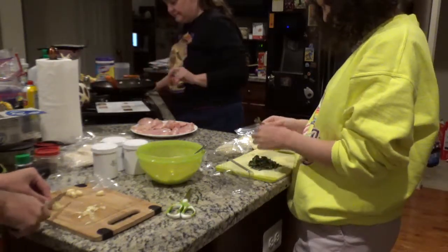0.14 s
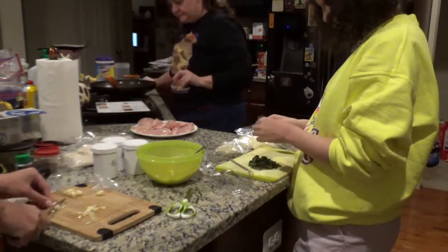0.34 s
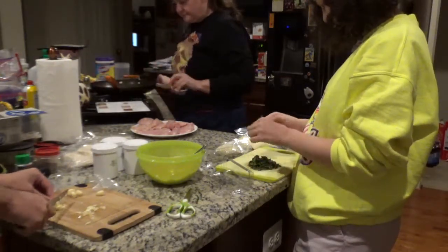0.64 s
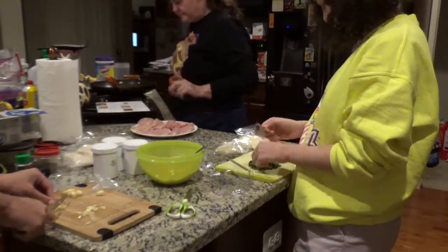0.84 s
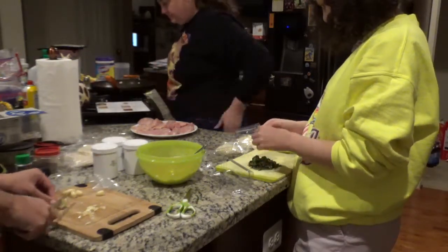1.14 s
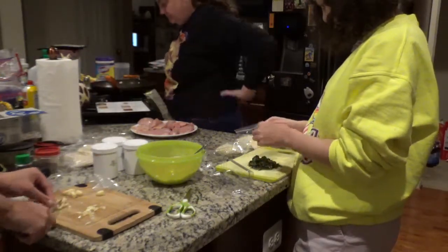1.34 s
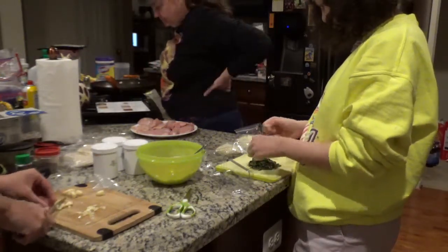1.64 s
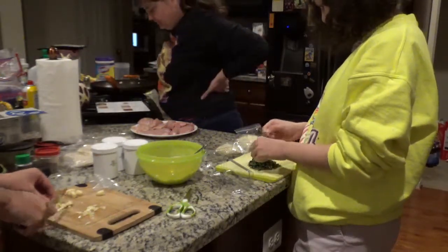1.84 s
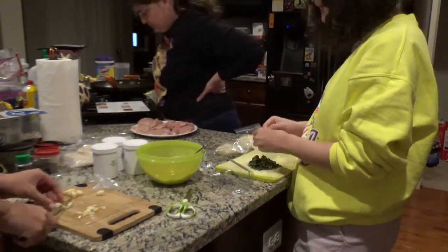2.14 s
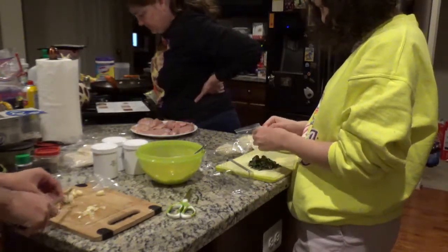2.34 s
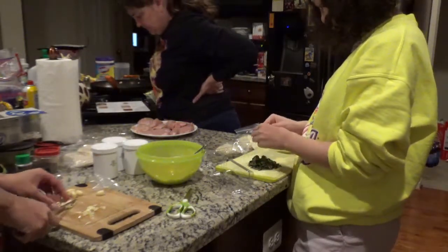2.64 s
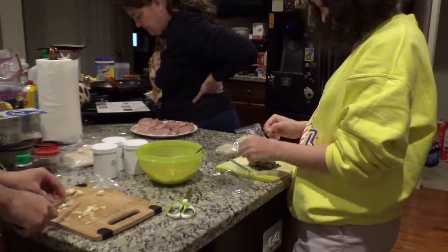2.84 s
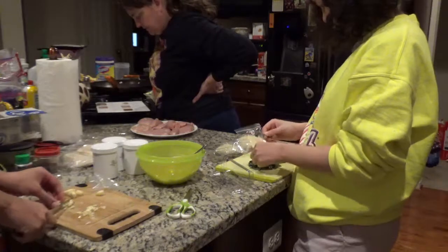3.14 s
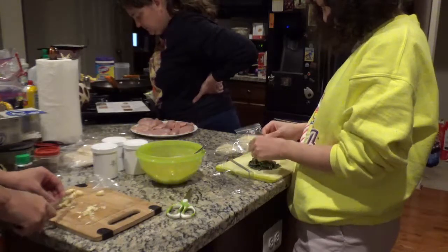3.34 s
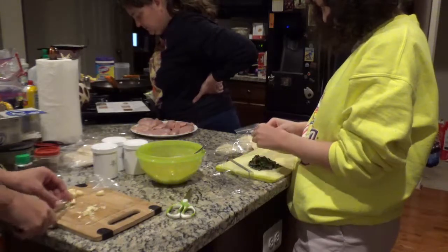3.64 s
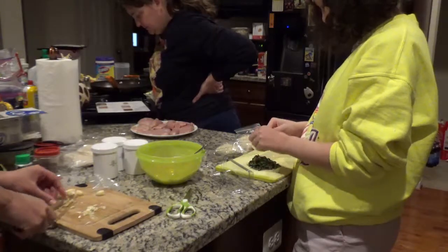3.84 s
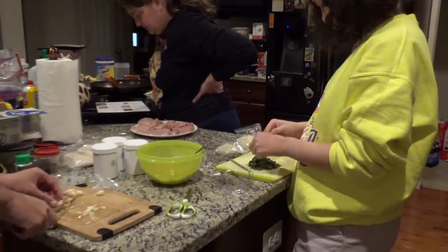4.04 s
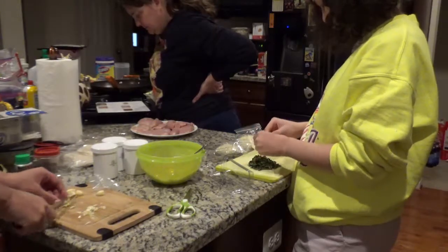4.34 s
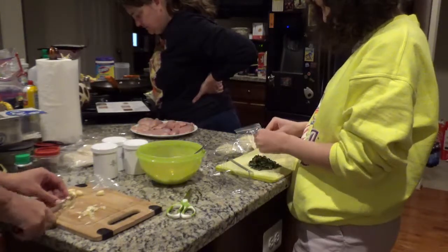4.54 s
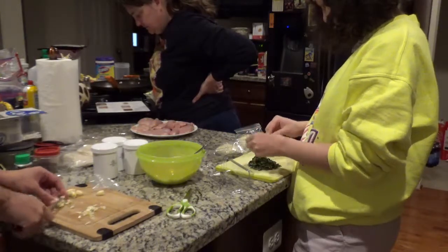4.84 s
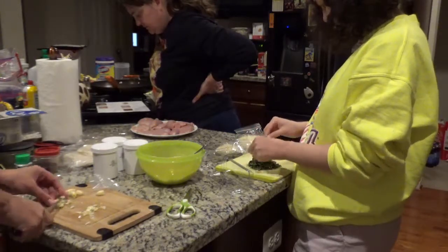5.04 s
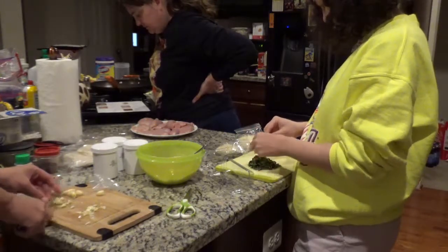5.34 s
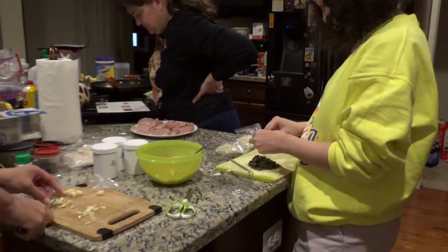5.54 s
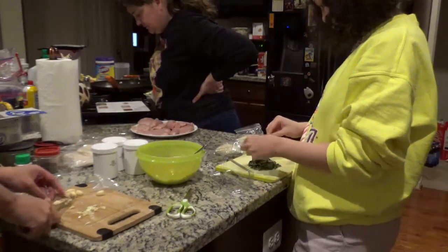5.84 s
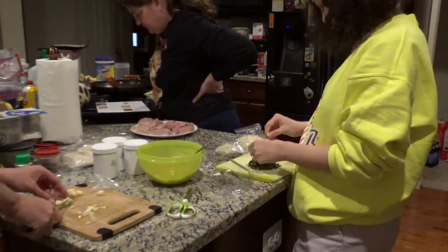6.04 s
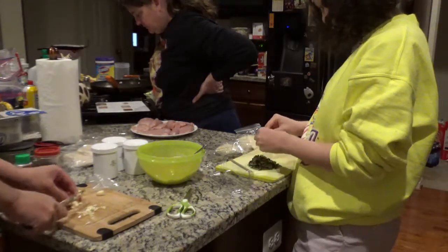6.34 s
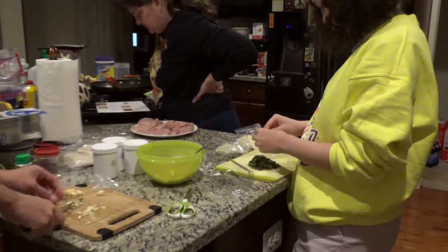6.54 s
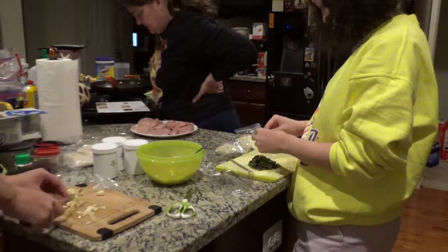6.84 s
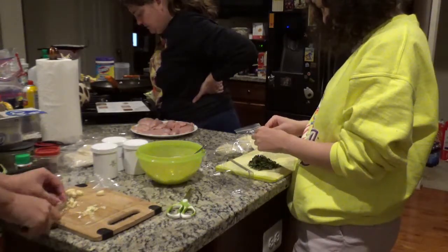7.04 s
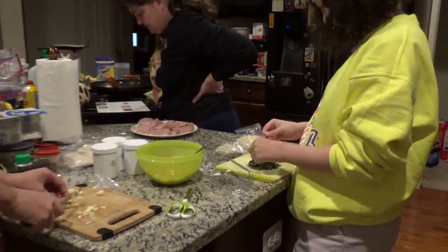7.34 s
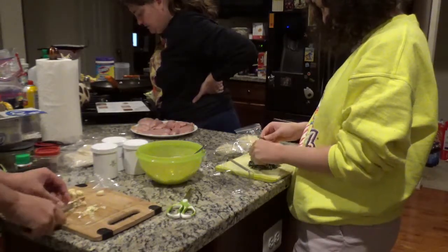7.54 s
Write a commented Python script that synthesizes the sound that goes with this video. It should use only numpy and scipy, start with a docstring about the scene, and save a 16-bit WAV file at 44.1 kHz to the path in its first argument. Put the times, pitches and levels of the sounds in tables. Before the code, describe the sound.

In a home kitchen, a knife cuts garlic on a wooden board close to the microphone. Thirteen sharp woody knocks fall unevenly over about seven and a half seconds, some loud and bright, some softer and duller. Crisp crunches come with many cuts, and thin high steel rings and wipes fill the gaps. Herbs and peel rustle faintly over a quiet appliance hum, with short room echoes.

```python
"""Cutting garlic on a wooden board

A kitchen knife cuts garlic on a wooden board on a stone counter, heard close up over an appliance's hum.
Each cut is a board-shaped impulse sent through room echoes; bursts of noise make the garlic crunch.
Wipes and slips sound the blade's narrow modes; herbs and peel are clumpy filtered noise with faint squeaks.
The appliance is noise shaped into rush and drones. A limiter ducks the loud knocks and recovers quickly."""
import sys
import numpy as np
from scipy import signal
from scipy.fft import rfft, irfft, next_fast_len
from scipy.io import wavfile
from scipy.ndimage import uniform_filter1d, map_coordinates

SR = 44100
rng = np.random.default_rng(int(sys.argv[2]) if len(sys.argv) > 2 else 0)


def store_pcm(level_fs):
    """Save levels as 16-bit WAV."""
    pcm = np.round(np.clip(level_fs, -1, 1) * 32767).astype(np.int16)
    wavfile.write(sys.argv[1], SR, np.atleast_2d(pcm).T)


N = 340011

# Fan's rush: (frequency [Hz], relative level [dB])
FAN_RUSH = [(20, -13), (50, -4), (75, -8), (140, -6.5), (240, 0.5), (350, -5.5), (700, -4.5), (1260, -12),
            (2300, -16), (8000, -22), (11000, -29.5)]
# Drones of the appliance's housing: (frequency [Hz], width [Hz], relative level [dB])
HOUSING_DRONES = [(172.8, 4.2, 4.5), (245.2, 4.3, 0.5), (300, 1.27, 11), (660, 6, -6), (843, 3.2, 4),
                  (983, 4.1, 2.5)]

# Fingers pick through herbs and peel: (time [s], relative level [dB], length [s])
HERB_RUSTLES = [(.53, -49, 0.17), (1.1, -48, 0.15), (1.61, -44.5, 0.29), (2.1, -49.5, 0.22),
                (2.78, -47, 0.29), (4.71, -43.5, 0.026), (5.62, -42, 0.091), (6.1, -53, 0.17),
                (6.53, -42, 0.048), (6.8, -50, 0.3), (7.28, -47, 0.5)]
# Colour of leaves and peel: (frequency [Hz], relative level [dB])
LEAF_COLOUR = [(300, -0.5), (900, 6), (2000, -10), (3300, -2.5), (6200, -5), (8400, 3.5), (11000, -19.5)]
# Resonances that the rustle stirs: (frequency [Hz], width [Hz], relative level [dB])
SQUEAK_MODES = [(1746, 25, 3), (3043, 56, 1), (5110, 44, -1.5)]
RUSTLE_ATTACK_S, RUSTLE_RELEASE_S = 0.085, 0.16
FIDGET_DB = -61  # the fingers never quite rest

# Narrow modes of the thin steel: (frequency [Hz], width [Hz], relative level [dB])
BLADE_MODES = [(7200, 16, -20), (7286, 11.5, -11.5), (8060, 26, -21), (8097, 24, -2.8), (8100, 26, -22)]
# A finger wipes garlic off the blade: (time [s], relative level [dB], length [s])
BLADE_WIPES = [(.69, -40, 0.021), (1.3, -49, 0.085), (1.565, -42, 0.023), (1.8, -45.5, 0.21),
               (2.01, -48, 0.095), (2.3, -52.5, 0.096), (2.875, -44, 0.08), (3.02, -43.5, 0.042),
               (3.955, -44, 0.021), (5.35, -42.5, 0.03), (5.68, -45, 0.25), (5.975, -45, 0.14),
               (6.23, -47.5, 0.088), (6.795, -43.5, 0.065), (6.97, -48, 0.13), (7.3, -49.5, 0.15)]
# The blade slips free: (time [s], level [dB], lift of its lower modes [dB])
BLADE_SLIPS = [(0.6737, -33, -6), (2.8857, -30, -9), (2.904, -33, -8), (3.0128, -34, 6), (5.6957, -32, -3),
               (5.9762, -26, -0.5)]
LIFT_AFTER_S, LIFT_S = 0.067, 0.13  # the blade is drawn out this soon after a cut, for this long
RUB_ATTACK_S, RUB_RELEASE_S = 0.039, 0.048
HELD_DB = -59  # the blade just held in the hand

# Crisp snaps of garlic flesh and skin: (time [s], level [dB], length [s])
GARLIC_SNAPS = [(0.286, -21, 0.025), (0.88, -23, 0.042), (1.337, -26.5, 0.039), (1.491, -22, 0.0088),
                (1.723, -24.5, 0.039), (2.046, -25, 0.035), (2.755, -24, 0.035), (3.013, -25, 0.045),
                (3.841, -29, 0.004), (4.397, -31, 0.035), (5.673, -24.5, 0.0093), (7.052, -25, 0.062)]
# Colour of one crack: (frequency [Hz], relative level [dB])
CRACK_COLOUR = [(200, -4.5), (1500, -4.5), (3000, -10.5), (6000, -9), (9000, -4), (11000, -17.5)]

# Knife meets board: (time [s], relative level [dB], contact corner [Hz], low thud [dB],
# place along the board, place across it [both 0 at the centre of the cutting area, +-1 at its edges],
# tip's lead over the heel [ms], tip's gain relative to the heel [held to 0-1],
# relative level of the rub as the blade lifts out [dB])
KNIFE_BLOWS = [(0.3009, 3.5, 5070, -3, -0.47, -0.22, 0.33, 0.08, -78),
               (0.894, 1.5, 4890, -2.2, -0.52, -0.04, 1.46, -1.8, -44),
               (1.353, -2, 2600, -2.5, -0.19, -0.43, 1.24, 0.34, -56),
               (1.545, -6.5, 2920, 1, 0.05, 0.58, 2, 0.26, -49.5),
               (2.515, 3.5, 6150, -1.5, 0.76, 0.021, 1.1, 0.13, -47),
               (3.456, -8, 4720, 1.5, -0.74, 0.5, 1.55, 0.54, -56),
               (3.9422, -8, 1900, 1, 0.14, -0.43, 1.23, 0.28, -64),
               (4.4351, -7.5, 3020, 7, 0.25, -0.28, 1.15, 0.3, -52),
               (4.879, 1, 4680, -3, 0.3, 0.54, 0.37, 0.2, -45.5),
               (5.3891, 2, 5300, 0, -0.79, -0.15, 0.847, 0.18, -44.5),
               (5.8136, 2.5, 4200, -4, 0.33, 0.22, 2.26, 0.34, -51),
               (7.091, 3.5, 2960, 1, 0.65, -0.51, 1.12, 0.38, -44.5),
               (7.5346, -0.2, 6550, -4, 0.44, 0.071, 1.56, 0.16, -42)]
# Board resonances over its broad response: (frequency [Hz], width [Hz], strength at the centre [dB],
# change per unit of place along [dB], change per unit of place across [dB])
BOARD_MODES = [(590, 75, 2.5, -4.5, 1), (708, 110, -1.3, -0.5, 0), (840, 50, 6, -2, -4.5),
               (914, 65, 5.5, 5.5, -2), (1107, 120.0, 7, -1.0, 8), (1177, 130, 12.5, 5.5, 6),
               (1401, 170, 5.5, -2, -0.5), (1510, 164.0, 1.3, -8.5, -6), (1612, 60, 6.5, -5, -1.4),
               (1731, 117, 8.5, 6, 8.5), (2040, 167, 6.5, -6, -1), (2114, 125, 5, -5, -3),
               (2284, 110, 0.2, 3.6, 2), (2408, 107, 2, 0.5, 5.5), (2740, 320, -5, 11, 5),
               (2810.0, 370, -6, -17.5, -8.5), (3092.0, 290, -2.2, -4, -3.0), (3360, 300, -2.0, 14.5, -8),
               (3940, 500, -2.5, 8.8, -20.5), (4910, 660, 0, 7.5, -11)]
# Broad response of board and knife: (frequency [Hz], relative level [dB])
WOOD_COLOUR = [(150, -26.5), (400, -15), (700, -9.5), (950, -7.5), (1050, -17.5), (1300, -10.5), (1900, -6),
               (2600, 0), (3600, -4.5), (5000, -7.5), (6400, -4.5), (9000, -6.5), (11000, -21)]
# Lightly damped modes that ring on after a knock: (frequency [Hz], relative level [dB])
LASTING_MODES = [(832, -53), (912, -51.5), (1195, -59.5), (1745, -51), (2750, -46), (3420, -52.5)]
AFTER_RING_T60_S = 0.27

# The blade is set down lightly on the board: (time [s], relative level [dB], place along the board [+-1])
BLADE_TAPS = [(2.058, -18.5, -0.35), (3.015, -29, 1), (4.4, -34, 0.74), (6.522, -31, 0.3)]

# Stereo width of diffuse sound: (frequency [Hz], side over mid [dB])
DIFFUSE_WIDTH = [(60, -19), (140, -23), (340, -16.5), (820, -10.5), (2000, -7.5), (11000, -9.5)]
# Kitchen reverberation: (frequency [Hz], time to fall by 60 dB [s])
KITCHEN_T60 = [(300, 0.31), (800, 0.47), (2100, 0.44), (5500, 0.37), (10000, 0.17)]
CEILING_S, CEILING_DB = 0.0072, -6  # the ceiling's echo, relative to the room
ROOM_RISE_S = 0.0023  # the room's build-up
SHADOW_HZ = 1090  # the board sends its bass upwards: below this little comes straight to the microphone
TOP_HZ = 11120  # nothing sounds above about this frequency


def amp(db):
    """Decibels to gain."""
    return 10 ** (np.asarray(db) / 20)


def unit(x):
    """Scale to rms 1."""
    return x / np.sqrt(np.mean(x ** 2) + 1e-20)


def along(points, hz):
    """Read (frequency, value) points on a log frequency axis."""
    f, v = np.transpose(points)
    return np.interp(np.log(hz + 1), np.log(f + 1), v)


def wobble(rate):
    """A smooth random curve with this many knots a second."""
    knots = rng.standard_normal(int(N * rate / SR) + 4)
    return map_coordinates(knots, [np.arange(N) * rate / SR])


def filtered(x, response):
    """Shape a sound by a response of frequency."""
    n = x.shape[-1]
    m = next_fast_len(n + SR // 4)
    return irfft(rfft(x, m) * response(np.fft.rfftfreq(m, 1 / SR)), m)[..., :n]


def causal(response, size=8192):
    """The impulse response that has this gain and starts at once (minimum phase)."""
    gain = np.maximum(response(np.fft.rfftfreq(size, 1 / SR)), 1e-6)
    cepstrum = irfft(np.log(gain))
    # fold the second half onto the first
    cepstrum[1:size // 2] *= 2
    cepstrum[size // 2 + 1:] = 0
    return irfft(np.exp(rfft(cepstrum)))


def add(track, s, sound):
    """Mix a stereo sound in at time s."""
    part = track[:, round(s * SR):][:, :sound.shape[1]]
    part += sound[:, :part.shape[1]]


def diffuse(n):
    """Stereo white noise from all around: nearly mono in the bass."""
    mid, side = rng.standard_normal((2, n))
    side = filtered(side, lambda hz: amp(along(DIFFUSE_WIDTH, hz)))
    return np.array([mid + side, mid - side])


def room_tail():
    """Reverberation with unit energy in the left channel; each frequency dies at its own speed."""
    hz, t, z = signal.stft(diffuse(SR * 2 // 3), SR, nperseg=256)
    decay = amp(-60 * t / along(KITCHEN_T60, hz)[:, None])
    tail = signal.istft(z * decay, SR, nperseg=256)[1]
    return tail / np.linalg.norm(tail[0])


def path(tail, near_db, near_t60, room_db):
    """Direct sound and scatter off the crowded counter, both thin in the bass, then ceiling and room."""
    t = np.arange(tail.shape[1]) / SR
    scatter = diffuse(len(t)) * amp(-60 * t / near_t60)
    near = amp(near_db) * scatter / np.linalg.norm(scatter[0])
    near[:, 0] += 1  # direct sound
    near = signal.lfilter(*signal.butter(1, SHADOW_HZ, "high", fs=SR), near)
    far = tail * (1 - np.exp(-t / ROOM_RISE_S))
    far[:, round(CEILING_S * SR)] += amp(CEILING_DB)
    return near + amp(room_db) * far


def ringing(modes, hz):
    """Complex response of (frequency, width, level) resonances."""
    return sum(amp(db) * 1j * hz * width / (f * f - hz * hz + 1j * hz * width) for f, width, db in modes)


def strokes(rows, attack_s, release_s, rest_db):
    """Gain of hand strokes over a resting level: each rises up to its time, holds, then fades."""
    t = np.arange(N) / SR
    power = amp(rest_db) ** 2
    for s, db, length in rows:
        rise = np.clip(1 + (t - s) / attack_s, 0, 1) ** 2
        fade = np.exp(-np.maximum(t - s - length, 0) / release_s)
        power = power + (amp(db) * rise * fade) ** 2
    return np.sqrt(power)


def rubbed(friction, modes, wander_db):
    """Modes kept ringing by friction, rms 1; the rubbing point moves, so each swells on its own."""
    total = 0
    for mode in modes:
        tone = filtered(friction, lambda hz: ringing([mode], hz))
        total = total + tone * amp(wander_db * wobble(13))
    return unit(total)


def appliance(air_db=-49.0, hum_db=-57):
    """A fan's rush and the narrow, restless drones of its housing, both shaped from noise."""
    rush = unit(filtered(diffuse(N), lambda hz: amp(along(FAN_RUSH, hz))))
    drone = unit(filtered(diffuse(N), lambda hz: ringing(HOUSING_DRONES, hz) / (1 + (hz / 1500) ** 4)))
    return amp(air_db) * rush + amp(hum_db) * drone


def herbs(level_db=-5.5, clump_db=2.0, squeak_db=-7):
    """Leaves and peel rustle in clumps of crackle and stir faint squeaks from what they lie on."""
    crackle = diffuse(N) * amp(clump_db * wobble(700) + wobble(28))
    leaves = unit(filtered(crackle, lambda hz: amp(along(LEAF_COLOUR, hz))))
    squeaks = rubbed(crackle, SQUEAK_MODES, wander_db=4.0)
    picking = strokes(HERB_RUSTLES, RUSTLE_ATTACK_S, RUSTLE_RELEASE_S, FIDGET_DB)
    return picking * amp(level_db) * (leaves + amp(squeak_db) * squeaks)


def blade_pluck(low_db):
    """A slip plucks the steel: each mode is a sine that dies at the rate its width sets."""
    age = np.arange(SR // 5) / SR
    split_hz = np.mean([hz for hz, *_ in BLADE_MODES])
    pluck = 0
    for hz, width, mode_db in BLADE_MODES:
        tone = np.sin(2 * np.pi * hz * age) * np.exp(-np.pi * width * age)
        pluck = pluck + amp(mode_db + low_db * (hz < split_hz)) * tone
    return pluck


def blade(level_db=-1, wander_db=3.0):
    """Uneven friction of each lift and wipe keeps the steel's narrow modes ringing; a slip plucks them."""
    friction = diffuse(N) * amp(0.97 * wobble(240))
    lifts = [(s + LIFT_AFTER_S, rub_db, LIFT_S) for s, *_, rub_db in KNIFE_BLOWS]
    rubbing = strokes(lifts + list(BLADE_WIPES), RUB_ATTACK_S, RUB_RELEASE_S, HELD_DB)
    flutter_db = 2.2 * wobble(55) + 1.5 * wobble(14)  # the steel catches and lets go
    out = rubbing * amp(level_db + flutter_db) * rubbed(friction, BLADE_MODES, wander_db)
    for s, db, low_db in BLADE_SLIPS:
        way = path(room_tail(), near_db=-10, near_t60=.03, room_db=-2)
        add(out, s, amp(db) * signal.fftconvolve(blade_pluck(low_db)[None], way, axes=1))
    return out


def snaps(level_db=0, rise_share=0.094):
    """Cells burst in a quick run of tiny cracks as the edge goes in."""
    out = np.zeros((2, N))
    crack = causal(lambda hz: amp(along(CRACK_COLOUR, hz)), size=512)
    t = np.arange(SR // 5) / SR
    for s, db, length in GARLIC_SNAPS:
        # widely scattered sample levels turn noise into separate cracks
        bursts = unit(rng.standard_normal(len(t)) * amp(9.1 * rng.standard_normal(len(t))))
        bursts = bursts * np.exp(-2 * t / length) * (1 - np.exp(-t / (rise_share * length)))
        way = path(room_tail(), near_db=-7, near_t60=.03, room_db=-4)
        crunch = signal.fftconvolve(np.convolve(bursts, crack)[None], way, axes=1)
        add(out, s, amp(db + level_db) * crunch)
    return out


def board(hz, corner_hz, thud_db, lengthwise, across):
    """Gain of one blow: the place picks the resonances, a cushioned contact loses the treble."""
    peaks = 0
    for f, width, db, along_db, across_db in BOARD_MODES:
        strength = amp(db + lengthwise * along_db + across * across_db) ** 2
        peaks = peaks + strength / (1 + (2 * (hz - f) / width) ** 2) ** 2
    contact = np.sqrt(1 / (1 + (hz / corner_hz) ** 10) + amp(-39.5))  # bottoms out near -20 dB
    thud = amp(thud_db / (1 + (hz / 1300) ** 4))
    return amp(along(WOOD_COLOUR, hz)) * np.sqrt(1 + 2 * peaks) * contact * thud


def after_ring(gain, n):
    """The knife's lasting modes, each as strong as the blow drives it."""
    t = np.arange(n) / SR
    tones = sum(amp(db) * gain(hz) * np.sin(2 * np.pi * hz * t) for hz, db in LASTING_MODES)
    return tones * amp(-60 * t / AFTER_RING_T60_S)


def knock(gain, tail, ring_db):
    """One blow on the board through counter and room, with the knife's after-ring laid on top."""
    # bending waves: treble travels faster
    spread = filtered(causal(gain), lambda hz: np.exp(-.6j * np.sqrt(hz)))
    way = path(tail, near_db=2.5, near_t60=0.052, room_db=0.5)
    blow = signal.fftconvolve(spread[None], way, axes=1)
    return blow + amp(ring_db) * after_ring(gain, blow.shape[1])


def chops(level_db=17.0, change=0.66):
    """Tip, then heel, knock the board; the room's answer changes a little as the knife moves."""
    out, usual = np.zeros((2, N)), room_tail()
    for s, db, corner_hz, thud_db, lengthwise, across, lead_ms, tip, _ in KNIFE_BLOWS:
        tail = np.cos(change) * usual + np.sin(change) * room_tail()
        struck = knock(lambda hz: board(hz, corner_hz, thud_db, lengthwise, across), tail, ring_db=-1)
        blow = amp(db + level_db) * struck
        add(out, s, np.clip(tip, 0, 1) * blow)  # the tip touches first
        add(out, s + lead_ms / 1000, blow)  # then the heel lands
    return out


def taps(level_db=9, corner_hz=2300, thud_db=17, ring_db=9):
    """Soft touches; with no weight on it the knife rings on more freely."""
    out = np.zeros((2, N))
    for s, db, lengthwise in BLADE_TAPS:
        touch = knock(lambda hz: board(hz, corner_hz, thud_db, lengthwise, 0), room_tail(), ring_db)
        add(out, s, amp(db + level_db) * touch)
    return out


def scene():
    """Knife work a touch to the left, over the herbs and the hum."""
    background = appliance() + herbs()
    knife_work = blade() + snaps() + chops() + taps()
    left_lean = amp([[.25], [-.25]])
    return background + knife_work * left_lean


def record(dry, threshold_db=-16.0, squeeze=0.67, release_db_per_s=280):
    """A limiter squeezes loud moments and recovers quickly; then everything above TOP_HZ is cut off."""
    power = np.abs(uniform_filter1d(np.mean(dry ** 2, axis=0), size=110))  # over 2.5 ms
    level_db = 10 * np.log10(power + 1e-12)
    excess = squeeze * np.maximum(level_db - threshold_db, 0)
    # the duck follows each peak at once, then falls back at a steady rate
    recovery = release_db_per_s * np.arange(N) / SR
    duck_db = np.maximum.accumulate(excess + recovery) - recovery
    gain = uniform_filter1d(amp(-duck_db), size=32)
    return filtered(dry * gain, lambda hz: np.clip((TOP_HZ - hz) / 200 + .5, 0, 1))


dry = scene()
out = record(dry)
store_pcm(out)
```